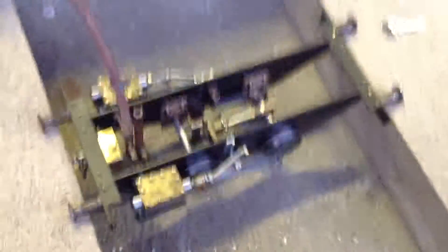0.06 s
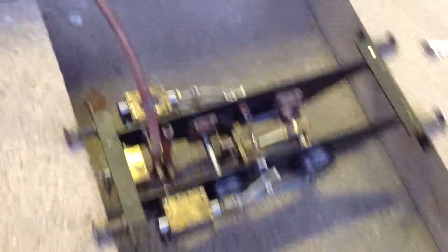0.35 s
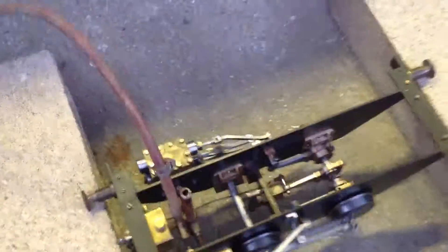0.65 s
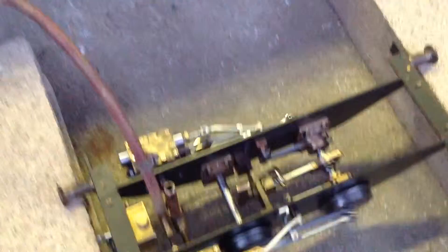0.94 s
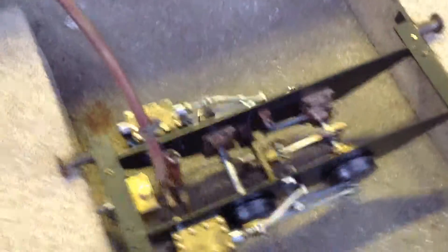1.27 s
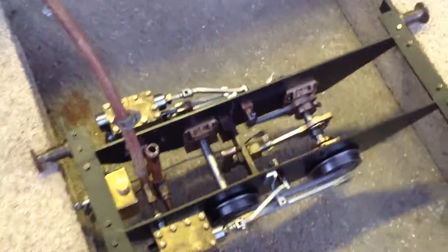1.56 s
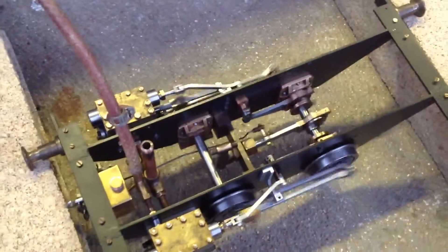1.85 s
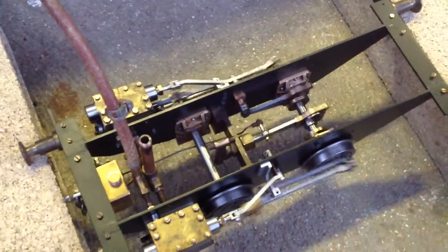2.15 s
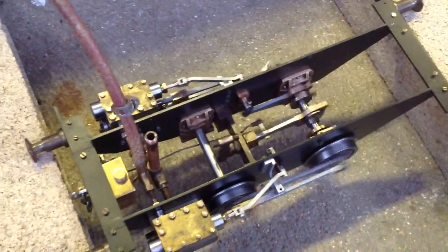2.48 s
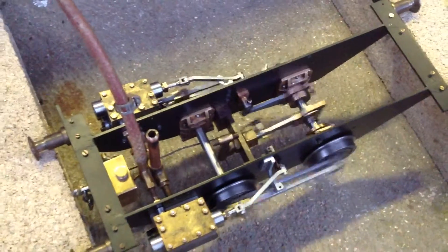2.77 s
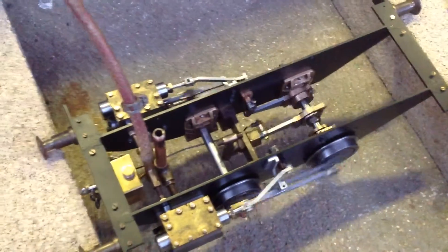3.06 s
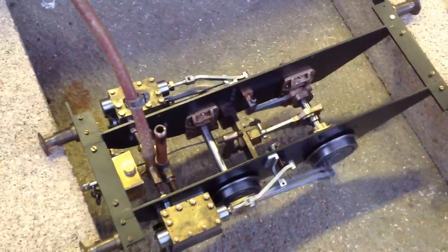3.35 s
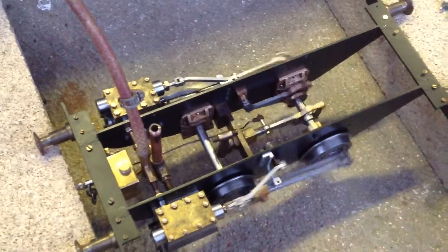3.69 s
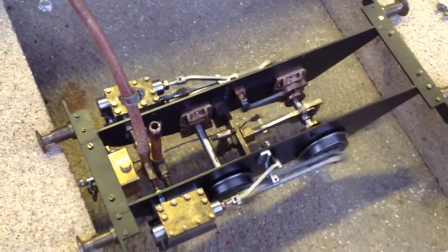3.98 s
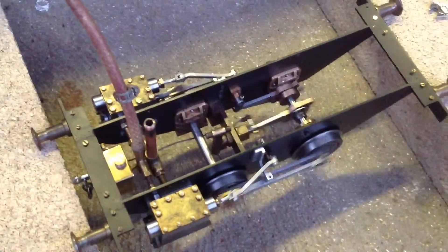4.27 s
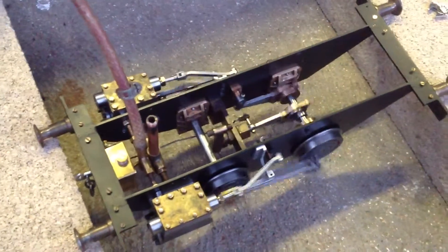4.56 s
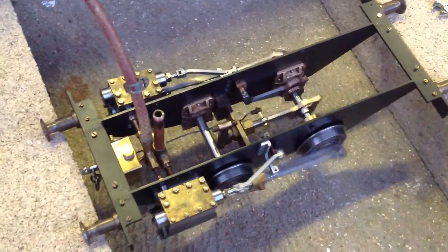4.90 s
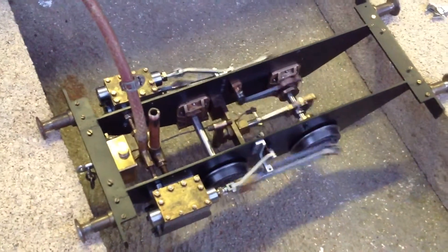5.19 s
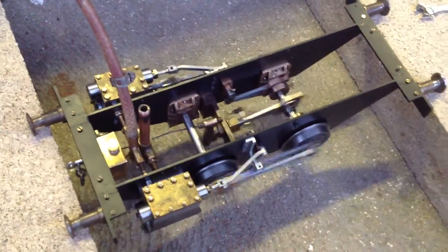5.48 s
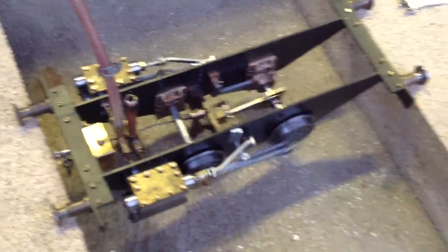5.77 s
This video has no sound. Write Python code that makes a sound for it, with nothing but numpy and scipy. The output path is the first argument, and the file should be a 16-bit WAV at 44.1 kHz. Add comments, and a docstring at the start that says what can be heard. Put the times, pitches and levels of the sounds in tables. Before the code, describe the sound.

Compressed air hisses steadily from the joints of a miniature locomotive chassis as its wheels and valve gear turn. Quick, ringing steel knocks and small ticks repeat in an even mechanical rhythm over soft, low puffs. After labouring for about two seconds, the mechanism picks up speed, clatters harder and settles at the faster pace. The microphone is close, in a workshop with very little echo.

```python
"""A model steam locomotive chassis runs on compressed air on a workbench, slowly picking up speed.
Its slack rod knocks twice a turn, exciting the modes of the steel; the valve gear taps the frame
plates, the crossheads rub, the ports gulp and the exhaust puffs, all in step with the crank.
Turbulent air hisses from leaking joints and a whistling gland. One close microphone hears it all."""
import sys
import numpy as np
from scipy import signal
from scipy.fft import rfft, irfft, next_fast_len
from scipy.io import wavfile
from scipy.ndimage import map_coordinates

SR = 44100
rng = np.random.default_rng(int(sys.argv[2]) if len(sys.argv) > 2 else 0)


def wrap_up_sound(samples):
    """Save the sound to the file named by the first command line argument, as 16-bit audio."""
    columns = np.atleast_2d(samples).T
    # keep every value between -1 and 1, then stretch to whole-number steps
    tamed = np.clip(columns, -1, 1)
    steps = np.round(tamed * 32767).astype(np.int16)
    wavfile.write(sys.argv[1], SR, steps)


N = 257544
TIME = np.arange(N) / SR


def amp(db):
    """Amplitude grows tenfold for every 20 dB."""
    return 10 ** (np.asarray(db) / 20)


def unit(x):
    """Normalisation to an rms of 1."""
    return x / np.sqrt(np.mean(x ** 2) + 1e-20)


def noise():
    """White noise has equal mean power at all frequencies."""
    return rng.standard_normal(N)


def wobble(rate):
    """Interpolation joins random values, rate of them a second, into a smooth curve."""
    return map_coordinates(rng.standard_normal(int(N * rate / SR) + 4), [TIME * rate])


def filtered(x, response):
    """A linear filter multiplies the spectrum by its frequency response."""
    m = next_fast_len(N + 8192)
    return irfft(rfft(x, m) * response(np.fft.rfftfreq(m, 1 / SR)), m)[:N]


def coloured(x, spectrum):
    """Spectral shaping through (Hz, dB) points; white noise keeps its power."""
    f, db = np.transpose(spectrum)
    return filtered(x, lambda hz: unit(amp(np.interp(np.log(hz + 1), np.log(f), db))))


def resonance(f, hz, width):
    """The response of a damped oscillator peaks at its natural frequency."""
    return 1j * f * width / (hz * hz - f * f + 1j * f * width)


def add(track, s, sound):
    """Superposition: a sound adds to the track from s seconds on."""
    i = round(s * SR)
    lo, hi = max(i, 0), min(i + len(sound), N)
    if hi > lo:
        track[lo:hi] += sound[lo - i:hi - i]


def bursts(rows, rise, fall):
    """Exponential growth and decay about each (seconds, dB) peak, with time constants in seconds."""
    track, t = np.zeros(N), np.arange(-SR // 20, SR // 20) / SR
    shape = np.exp(np.where(t < 0, t / rise, -t / fall))
    for s, db in rows:
        add(track, s + t[0], amp(db) * shape)
    return track


def crank():
    """Angle is the integral of speed. Returns the angle in turns and the speed in dB re top speed."""
    # The wheels labour, pick up and settle. Each row: time in seconds, turns per second.
    speed_curve = [(0.0, 3.226), (1.37, 3.138), (1.38, 3.082), (1.87, 3.046), (2.51, 3.576), (2.76, 3.627),
                   (3.53, 4.124), (4.53, 4.124), (5.84, 4.061)]
    speed = np.interp(TIME, *np.transpose(speed_curve))
    turns = np.cumsum(speed) / SR
    dead_centre = np.interp(.1112, TIME, turns)  # first pass of front dead centre
    return turns - dead_centre, 20 * np.log10(speed / speed.max())


def passes(angle, at):
    """Rotation is periodic: the times in seconds at which the crank reaches one angle."""
    turns = np.arange(np.ceil(angle[0] - at), angle[-1] - at) + at
    return np.interp(turns, angle, TIME)


def stroke(angle):
    """Cyclic loading: friction and airflow vary alike in every turn."""
    # Each row: angle in turns, then relative dB of friction, gland leak, exhaust flow and whistle.
    cycle = [(0, 5, 10, 10, -14), (.08, -16, 7.5, 1, -18), (.17, 2.5, 6.5, 6.5, -12), (.27, 4, 10, 7, -3),
             (.4, -0.5, 8, 3.5, -5), (.55, -3, 7.5, 9, -6), (.635, 1.5, 9, 4.5, 2), (.76, 2.5, 1, 8, -11),
             (.88, -20, -3, -2.5, -5)]
    at, *loads = np.transpose(cycle)
    return [np.interp(angle, at, db, period=1) for db in loads]


def air(angle, speed_db):
    """Turbulence makes broadband noise at joints, gland and exhaust; a resonance makes it whistle."""
    # Spectra of the three jets. Each row: frequency in Hz, relative spectral density in dB.
    leak_spectrum = [(100, -31), (700, -14), (1150, -7.5), (1750, -10.5), (3200, -4.5), (3900, -4),
                     (5600, 0), (6900, 3), (8000, 2), (9000, 3.5), (11000, 5), (12600, 2.5), (14600, 4.5),
                     (15200, 3.5)]
    gland_spectrum = [(1000, -37), (5000, -24), (6700, 3.5), (8500, -8.5), (11500, 1.5), (13200, 3),
                      (13870, -5), (14400, 4), (15200, 5.5)]
    exhaust_spectrum = [(25, -42), (50, -50), (80, -12), (120, -15.5), (210, 1.5), (250, -2.5), (390, -1.5),
                        (600, -6), (1150, -6), (1750, -6.5), (4000, -17)]
    # The gland's resonance: frequency in Hz, bandwidth in Hz.
    whistle_mode = (13820, 250)
    # The microphone swings in over the cylinders. Each row: time in seconds, gain of the leaks in dB.
    aim_curve = [(0.1, -0.9), (.55, -1.5), (.85, 0)]
    _, blow_db, flow_db, whistle_db = stroke(angle)
    blow_db = blow_db - blow_db.max()
    flutter = lambda: amp(.25 * wobble(40))
    # The supply pressure that speeds the wheels also feeds the leak.
    leak = amp(-27.5 + .86 * speed_db) * flutter() * coloured(noise(), leak_spectrum)
    gland = amp(-28 - .1 * speed_db + blow_db) * flutter() * coloured(noise(), gland_spectrum)
    tone = unit(filtered(noise(), lambda f: resonance(f, *whistle_mode)))
    whistle = amp(-37 - 1.7 * speed_db + whistle_db) * tone  # strongest in slow, heavy running
    rush = amp(flow_db - 49.5 + speed_db) * coloured(noise(), exhaust_spectrum)
    aim = amp(np.interp(TIME, *np.transpose(aim_curve)))
    return aim * (tray(leak + gland) + whistle) + rush


def tray(x, echo_db=-23, delay_range_s=(.0018, .012), count=10):
    """Interference with weak echoes from the steel tray under the chassis ripples the spectrum."""
    response = np.zeros(SR // 20)
    response[0] = 1
    delays = (SR * rng.uniform(*delay_range_s, count)).astype(int)
    response[delays] = amp(echo_db) * rng.choice([-1, 1], count)
    return signal.fftconvolve(x, response / np.linalg.norm(response))[:N]


def friction(angle, speed_db):
    """Sliding friction excites the crossheads and their bars, which sing thinly under load."""
    # The slide bars' resonance: frequency in Hz, bandwidth in Hz.
    bar_mode = (4745, 35)
    load_db = stroke(angle)[0]
    rub = steel(amp(load_db - 45.5 + 2.3 * speed_db + 4.1 * wobble(200)) * noise())
    singing = unit(filtered(noise(), lambda f: resonance(f, *bar_mode)))
    return rub + amp(load_db - load_db.max() - 42 + 2 * speed_db) * singing


def steel(force):
    """Modal response of the rods and crossheads, which are too thin to radiate low notes."""
    # Each row: mode frequency in Hz, bandwidth in Hz, relative level in dB.
    modes = [(2293, 230, -9), (2625, 73, 7), (2966, 233, -0.5), (3500, 510, -4.5), (4625, 216, 4),
             (5515, 34, 3), (6370, 87, 1), (6825, 620, -1.5), (8430, 207, 4), (10630, 400, 1.5)]
    ringing = lambda f: sum(amp(db) * resonance(f, hz, width) for hz, width, db in modes)
    return filtered(force, lambda f: unit(ringing(f) * f ** 4 / (f ** 4 + 1900 ** 4)))


def ticks_and_knocks(angle, speed_db, ring_db=-.7, crack_db=-3.5, scatter_db=.7):
    """Impacts in the running gear and slack rod bearing chatter briefly and set the steel ringing."""
    # Light metallic ticks of the running gear, two of them on the once-a-turn valve tick.
    # Each row: time in seconds, relative level in dB.
    gear_ticks = [(.007, -38), (.287, -35.5), (.319, -36), (2.795, -39)]
    # The bearing takes up its slack at front, then back dead centre. Each row: angle in turns,
    # relative level at top speed in dB, dB gained per dB of speed, lag in turns per dB of speed.
    knocks = [(0, -26.4, 2.7, 0), (.4655, -23.1, 2.9, .0065)]
    # The crack of contact. Each row: frequency in Hz, relative spectral density in dB.
    crack_spectrum = [(100, -30), (700, -11), (1300, -4), (1900, -17), (2400, -2), (3500, 0), (3900, -8),
                      (4600, 1), (5900, -8), (6700, -1), (8500, -1), (9600, -8), (15500, -10)]
    blows = [(s, db + growth * np.interp(s, TIME, speed_db) + rng.normal(0, scatter_db))
             for at, db, growth, lag in knocks for s in passes(angle - lag * speed_db, at)]
    force = bursts(blows, rise=.0023, fall=.0034) + bursts(gear_ticks, rise=.001, fall=.003)
    chatter = lambda: unit(noise() * amp(1.5 * wobble(2500)))
    ring = amp(ring_db) * steel(force * chatter())
    crack = amp(crack_db) * coloured(force * chatter(), crack_spectrum)
    return ring + crack


def frame_taps(angle, speed_db, attack_s=.004, scatter_db=1.2):
    """Tapped by the valve gear, the frame plates vibrate freely; speed brings out the upper mode."""
    # Each row: angle in turns, relative dB of the low and upper modes, dB gained per dB of speed.
    taps = [(.02, -40, -28.5, 0), (.14, -42.5, -38, -1), (.255, -37.5, -34.5, 0.4), (0.364, -48, -35.5, 22),
            (.475, -48, -32.5, -0.3), (.665, -38.5, -37, 1.5), (0.718, -44, -30, 0.5)]
    # Each row: plate mode frequency in Hz, time to decay by 60 dB in seconds.
    modes = [(809, 0.12), (1382, 0.042)]
    t = np.arange(SR // 5) / SR
    rings = np.zeros((len(modes), N))
    for at, *levels, growth in taps:
        for s in passes(angle, at):
            strength_db = growth * np.interp(s, TIME, speed_db)
            for ring, (hz, t60), db in zip(rings, modes, levels):
                pitch = hz * (1 + rng.normal(0, .008))
                swing = np.sin(2 * np.pi * (pitch * t + rng.random()))
                decay = amp(db + strength_db + rng.normal(0, scatter_db) - 60 * t / t60)
                add(ring, s, decay * (1 - np.exp(-t / attack_s)) * swing)
    return amp(3.5) * rings[0] + amp(3 + 1.55 * speed_db) * rings[1]


def valve_ticks(angle, level_db=-37, at_turn=.675):
    """A light impact of the valve rod radiates a bright burst of noise once a turn."""
    ticks = [(s, level_db + rng.normal(0, 1.5)) for s in passes(angle, at_turn)]
    force = bursts(ticks, rise=.001, fall=.003) * noise()
    return coloured(force, [(1000, -34), (2600, -7), (3400, 17), (5500, 3), (12000, -19)])


def exhaust_beats(angle, hz=175, width_s=.0027):
    """Each release of a cylinder radiates a soft, low pressure pulse."""
    # Each row: crank angle in turns, level in dB.
    beats = [(.272, -38), (.5, -50), (.73, -47), (.985, -53)]
    track, t = np.zeros(N), np.arange(-SR // 30, SR // 30) / SR
    for at, db in beats:
        for s in passes(angle, at):
            pitch = hz * (1 + rng.normal(0, .04))
            pulse = np.cos(2 * np.pi * pitch * t) / np.cosh(t / width_s)
            add(track, s + t[0], amp(db + rng.normal(0, 1)) * pulse)
    return track


def port_gulps(angle, scatter_db=2.5):
    """A cavity resonance falls in pitch as the ports open onto a growing volume of air."""
    # Each row: angle in turns, start and end frequencies in Hz, length in seconds, level in dB.
    gulps = [(.125, 523, 407, 0.0099, -41.5), (0.167, 478, 302, 0.0184, -47.5),
             (0.356, 500, 407, 0.04, -64), (0.495, 245, 219, 0.035, -50), (0.54, 431, 260, 0.0292, -49.5),
             (0.861, 407, 361, 0.029, -47)]
    track = np.zeros(N)
    for at, start_hz, end_hz, length, db in gulps:
        progress = np.linspace(0, 1, int(length * SR))
        for s in passes(angle, at):
            hz = start_hz * (end_hz / start_hz) ** progress * (1 + rng.normal(0, .04))
            envelope = amp(db + rng.normal(0, scatter_db)) * np.sin(np.pi * progress)
            add(track, s, envelope * np.sin(2 * np.pi * np.cumsum(hz) / SR))
    return track


def bench_scuff():
    """One brief contact on the bench makes a noise burst, dull because it has little treble."""
    # Each row: frequency in Hz, relative spectral density in dB.
    spectrum = [(40, -42), (130, -12), (300, -0.5), (750, 1.5), (1050, -13), (1400, -2), (2500, -22),
                (8000, -50)]
    return coloured(bursts([(.379, -33)], rise=.009, fall=.009) * noise(), spectrum)


def room(x, t60):
    """Reverberation: the workshop's reflections build up, then decay by 60 dB in t60 seconds."""
    t = np.arange(SR // 3) / SR
    tail = rng.standard_normal(len(t)) * amp(-60 * t / t60) * (1 - np.exp(-t / .0095))
    return signal.fftconvolve(x, tail / np.linalg.norm(tail))[:N]


def scene():
    """The sources superpose, paced by one crank; only the transients feed the reverberation."""
    angle, speed_db = crank()
    continuous = air(angle, speed_db) + friction(angle, speed_db)
    impacts = ticks_and_knocks(angle, speed_db) + frame_taps(angle, speed_db) + valve_ticks(angle)
    transients = impacts + exhaust_beats(angle) + port_gulps(angle) + bench_scuff()
    mono = continuous + transients + amp(-13) * room(transients, t60=.18)
    return np.array([mono, mono])


def record(dry):
    """The microphone is a band-pass filter: it loses the deep bass and all above its band limit."""
    bass_hz, top_hz = 70, 15400
    response = lambda hz: (hz < top_hz) * hz ** 2 / np.sqrt(hz ** 4 + bass_hz ** 4)
    return np.array([filtered(channel, response) for channel in dry])


dry = scene()
out = record(dry)
wrap_up_sound(out)
```